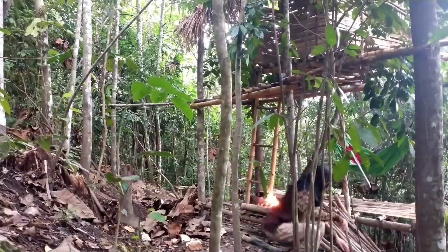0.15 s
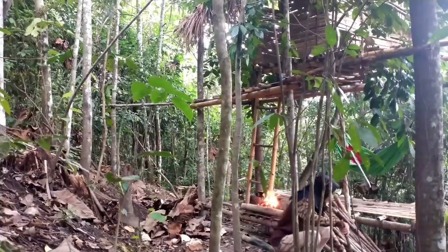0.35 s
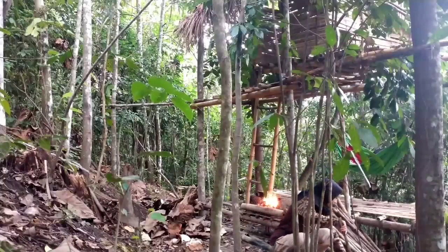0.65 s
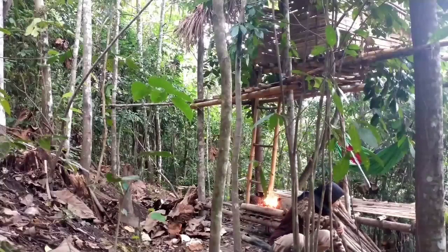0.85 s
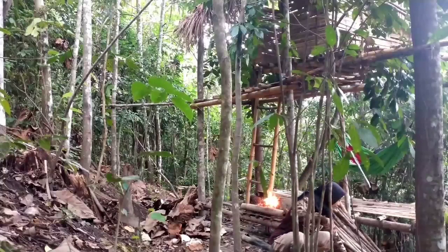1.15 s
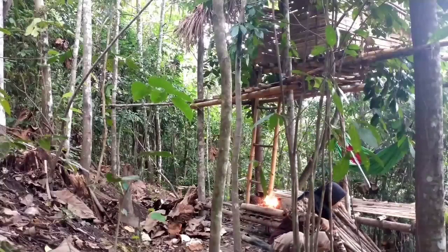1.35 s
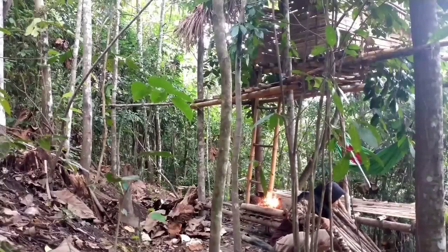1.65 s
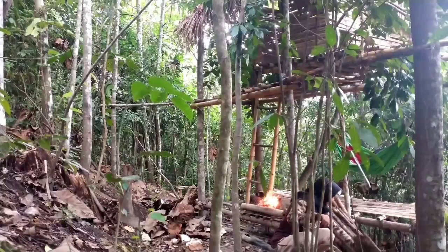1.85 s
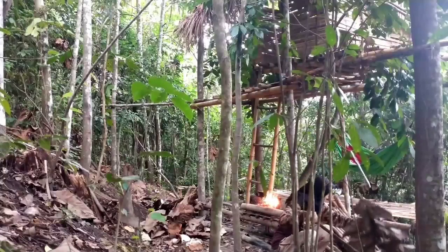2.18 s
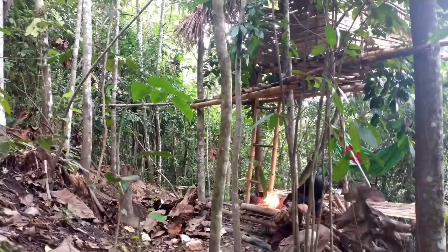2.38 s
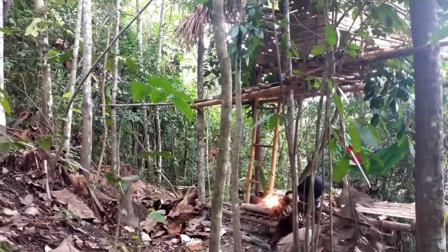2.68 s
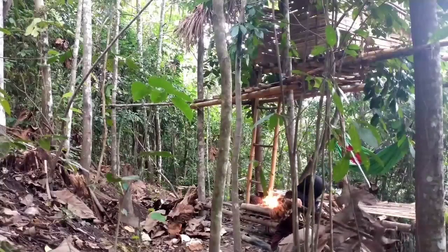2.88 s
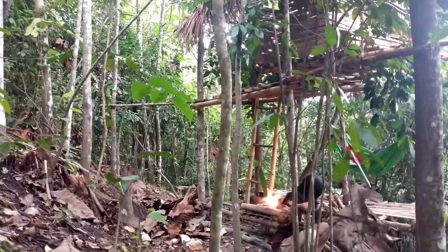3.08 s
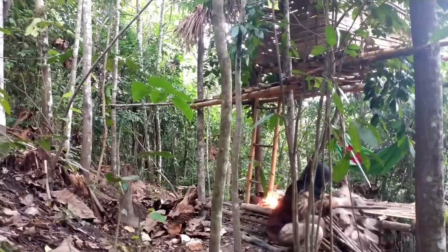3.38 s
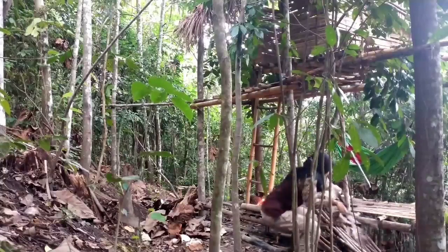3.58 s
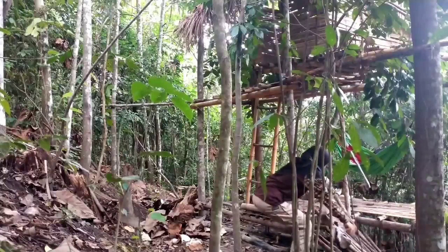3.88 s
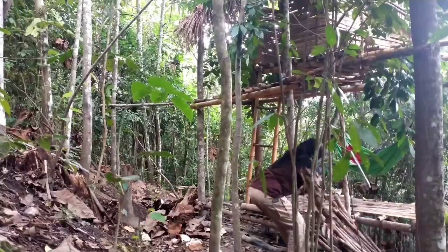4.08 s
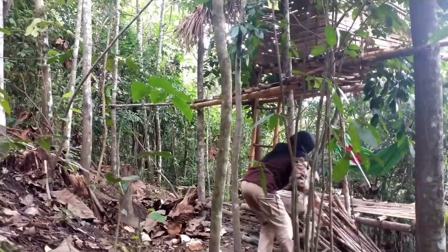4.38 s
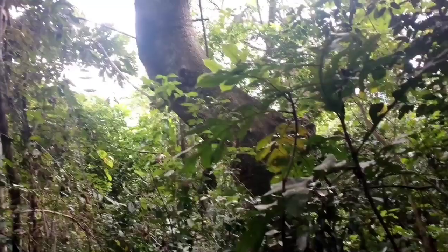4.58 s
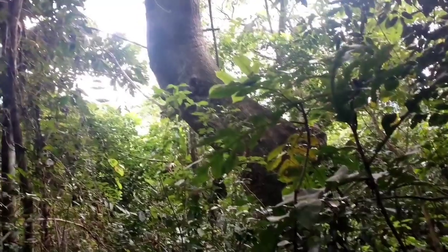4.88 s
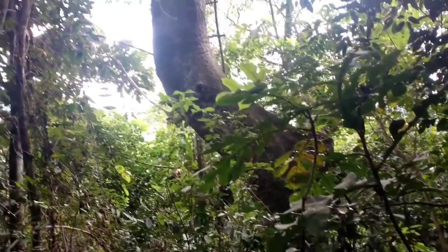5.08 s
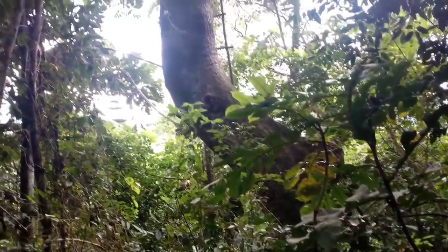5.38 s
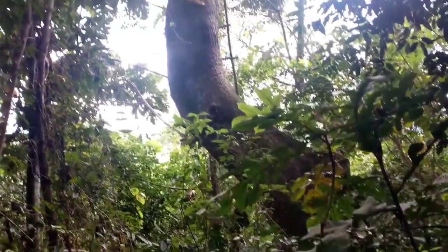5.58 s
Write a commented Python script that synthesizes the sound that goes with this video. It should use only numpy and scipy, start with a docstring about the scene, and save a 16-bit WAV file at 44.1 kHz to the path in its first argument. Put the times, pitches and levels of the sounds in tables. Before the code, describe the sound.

In a humid tropical forest, cicadas give rising whistles that break into rasping buzzes, over a continuous high bush-cricket whine and an intermittent treble shrill. At middle distance someone handles dry leaves and sticks, with light crackles, snaps and small woody knocks. Near the end a cut leads to another spot with louder crickets and no handling. Plain, thin outdoor pickup, same in both channels.

```python
"""Cicadas in a tropical forest: some whistle upwards and break into a buzz, built from the harmonics of their
clicks. Another shrills far up in the treble. Bush crickets, far whines and a distant chorus are blurred tones.
Someone steps and handles dry leaves and sticks: noise bursts that crackle, crack, thud and knock. Air is shaped
noise. Near the end we hear a second place, where the bush crickets are louder and one small cricket trills."""
import sys
import numpy as np
from scipy import signal
from scipy.fft import rfft, irfft
from scipy.io import wavfile

SR = 44100
rng = np.random.default_rng(int(sys.argv[2]) if len(sys.argv) > 2 else 0)


def file_out(sig):
    """Save sig as 16-bit WAV at sys.argv[1]."""
    # one column per channel
    cols = np.atleast_2d(sig).T
    # limit, then scale
    lim = np.clip(cols, -1, 1)
    pcm = np.round(lim * 32767).astype(np.int16)
    wavfile.write(sys.argv[1], SR, pcm)


N = 252957

MOVE_S = 4.84  # when the second place takes over
EDGE_HZ = 15520  # top of the treble
SLOW_ECHO, QUICK_ECHO = 0.32, 0.42  # strength of a whistle's two echoes, as shares of the direct sound
CRICKET_HZ, CRICKET_FULL_DB, CRICKET_HZ_PER_DB = 9225, -49, 15  # pitch at full effort; it sags with the effort
STROKE_ATTACK_S, STROKE_RELEASE_S = 0.014, 0.05

# Levels are set before the swells, the echoes of the forest and the brief dip.
# Moving air and far foliage: (pitch [Hz], strength [dB per Hz, relative])
AIR_SPECTRUM = [(15, 10), (30, -7.5), (60, -5), (120, -11), (250, -20), (600, -22.5), (1300, -21.5),
                (3500, -18), (6300, -21), (8300, -14), (10000, -18), (15500, -14)]
# Level of the air at the first and second place: [dB]
AIR_LEVELS = [-53.5, -56.5]
# Distant chorus: (pitch [Hz], width [Hz], level at first place [dB], level at second [dB])
CHORUS_KINDS = [(1792, 199, -60.5, -60.5), (1803, 60, -66.5, -65.5), (2062, 290, -65.5, -63.5),
                (2334, 260, -67, -66), (2647, 98, -68.5, -74.5), (2874, 130, -66, -73),
                (7410, 870, -67, -68), (10900, 1200, -63, -64), (12720, 2400, -59, -57.5),
                (15100, 2000, -59.5, -61.5)]
# Faint whines from further off; a call that ends before it starts stays silent:
# (start [s], end [s], first pitch [Hz], last pitch [Hz], width [Hz], level [dB])
FAR_CALLS = [(1.8, 2.2, 5520, 5620, 99, -64.5), (1.4, 2.5, 3800, 3640, 200, -78),
             (1.85, 2.5, 3400, 3900, 180, -65), (2.78, 3.46, 2830, 2900, 280, -59.5),
             (4.7, 3.72, 3200, 2950, 28, -65), (3.55, 3.92, 5600, 5480, 470, -69),
             (2.9, 4.5, 3800, 3400, 710, -71), (4.4, 5.2, 5400, 5400, 1600, -70)]
# Effort of the bush crickets, tiring at the first place and fresh at the second: (time [s], level [dB])
CRICKET_EFFORT = [(0, -49), (3.4, -54.5), (3.55, -61), (4.8, -68), (4.96, -46), (5.12, -50), (5.74, -48)]
# Bush cricket voices, mixed before the effort sets their level:
# (pitch [factor on the centre], width [Hz], share at first place [dB], share at second [dB])
CRICKET_VOICES = [(.972, 53, -7.5, -7), (.9915, 100, -6.5, -3), (1, 99, -4.5, 0.5), (1.02, 32, -3.5, -17),
                  (1.003, 620, 2, -2)]
# Colour of the leaf crackle: (pitch [Hz], strength [dB per Hz, relative])
LEAF_SPECTRUM = [(200, -18), (700, -6.5), (1500, -1), (3000, 5), (5000, -5.5), (8000, 0), (12000, -1.5),
                 (15500, 0)]
# Colour of the dull scraping of the litter: (pitch [Hz], strength [dB per Hz, relative])
LITTER_SPECTRUM = [(60, -34), (170, -9), (400, -6), (650, -5.5), (1100, -2), (1600, 1), (2500, -1),
                   (4500, -12.5), (9000, -38)]
# Pushes on handfuls of dry leaves, levels before each rustle's own lift:
# (start [s], end [s], crackle [dB], scraping [dB], fade over the stroke [dB])
LEAF_STROKES = [(0.013, 0.041, -46, -61, 4.5), (0.4, 0.604, -72, -63.5, 6.5),
                (1.007, 1.642, -61.5, -63, -1), (1.656, 2.5, -56.5, -61.5, 0.5),
                (2.137, 2.227, -47, -73, 1.5), (2.354, 2.508, -51, -73, 8), (2.503, 4.1, -72, -72, 0),
                (4.115, 4.486, -46, -53.5, 10.5), (4.47, 4.78, -61, -69, 10), (4.785, 4.79, -50, -69, 5)]
# Cracks of dry leaves: (time [s], peak level [dB])
LEAF_CRACKS = [(0.031, -47), (2.169, -36), (2.2015, -30.5), (2.409, -43), (2.495, -33), (4.17, -32.5),
               (4.186, -31.5), (4.236, -29.5), (4.282, -36), (4.376, -35), (4.39, -35), (4.798, -32.5)]
# Knocks and snaps of sticks, led by one footfall with a heavy low thud: # (time [s], peak level [dB], main ring
# [Hz], thud [Hz], thud in the mix [dB])
STICK_KNOCKS = [(.023, -44, 1235, 193, 17), (0.988, -38.5, 1270, 480, -6), (1.185, -43, 2200, 400, -25.5),
                (1.333, -49, 894, 330, -14), (1.449, -43.5, 1310, 405, -18), (1.755, -53, 900, 330, -21),
                (1.898, -50, 1180, 400, -5), (2.154, -42, 1270, 356, 1), (2.437, -47.5, 1090, 400, -15),
                (2.945, -50.5, 1300, 400, 2), (3.806, -49, 1070, 400, -7), (4.186, -56, 1380, 400, -3),
                (4.278, -47.5, 930, 453, 4), (4.48, -46.5, 740, 437.5, 3), (4.626, -51, 1230, 404, -12),
                (4.676, -42, 2200, 335, -11), (4.796, -46, 1255, 400, -27)]
# Ringing modes of a stick, each pitch then varied a little:
# (pitch [factor on the main ring], strength [dB], time to fall 60 dB [s])
STICK_MODES = [(.55, -4, 0.008), (.8, -7, 0.0099), (1, 6, 0.02), (1.2, -3, 0.086), (1.85, -2, 0.028),
               (3.1, -22, 0.015)]
# Shrill cicada, one list of points a bout: (time [s], rib rate [Hz], level [dB])
SHRILL_BOUTS = [
    [(0, 1843, -49), (.8, 1830, -49.5), (1.55, 1834, -48.5), (1.72, 1795, -51.5), (1.88, 1760, -58)],
    [(3.33, 1857, -56), (3.48, 1834, -49.5), (4.1, 1840, -49), (4.78, 1832, -49.5), (4.87, 1850, -74)],
]
# Harmonics of its rib rate: (harmonic [number], strength [dB, relative])
SHRILL_HARMONICS = [(5, -10), (6, -.5), (7, 2), (8, 0.5)]
# Buzzes: (start [s], end [s], click pairs [per s], level [dB], treble edge [Hz], swell [s])
BUZZ_CALLS = [(0.412, 1.08, 142.3, -56.5, 6760, 0.053), (0.977, 1.62, 145.1, -57.5, 6300, 0.042),
              (2.764, 3.373, 150.0, -49, 8750, 0.045), (4.446, 4.867, 143.3, -56.5, 6470, 0.1)]
# Resonances of a buzzing cicada's body: (pitch [Hz], width [Hz], strength [dB, relative])
BUZZ_RESONANCES = [(3153, 27, 2), (3500, 1040, -12.5), (4354, 28, -1.5), (4670, 250, -7), (4940, 81, 0.5),
                   (5215, 134, 0.5), (5630, 210, -2), (6080, 123, -3), (6450, 85, 0), (6800, 130, -4),
                   (7950, 600, -8)]
# Whistles, levels before a common lift: (start [s], end [s], pitch approached at the end [Hz],
# first level [dB], last level [dB], crest [s], slow swells [per s], quick swells [per s])
WHISTLE_CALLS = [(-.2, .464, 2989, -48.5, -52, 0.076, 2.6, 5.9),
                 (.41, 1.03, 2928, -50.5, -56, 0.65, 2.94, 9.1),
                 (1.357, 1.892, 3015, -59.5, -56.5, 1.84, 3.16, 10.3),
                 (2.205, 2.81, 3058, -51, -43, 2.75, 2.27, 8.35),
                 (3.85, 4.538, 2994, -53, -53.5, 4.11, 4.1, 11.5),
                 (4.791, 4.878, 2850, -61, -69, 4.82, 3, 10), (5.34, 5.597, 2885, -75, -63, 5.1, 4.5, 6.5),
                 (5.641, 5.802, 2930, -62.5, -56, 5.6, 3, 9.8)]
# The abdomen rings on the tenth harmonic of the tymbal clicks: (harmonic [number], strength [dB, relative])
WHISTLE_HARMONICS = [(8, -25), (9, -12), (10, 2.5), (11, -18.5), (12, -21), (13, -37), (18, -40),
                     (19, -26.5), (20, -26), (21, -55)]


def amp(db):
    """Turns decibels into gain."""
    return 10 ** (np.asarray(db) / 20)


def evened(x):
    """Scales a sound to an average strength (rms) of 1."""
    return x / np.sqrt(np.mean(abs(x) ** 2) + 1e-20)


def clock():
    """The time of every sample, in seconds."""
    return np.arange(N) / SR


def curves(rows):
    """Joins the rows by straight lines, one curve for each column after the time."""
    times, *columns = np.transpose(rows)
    return [np.interp(clock(), times, column) for column in columns]


def gate(start, end, rise=0.015, fall=0.012):
    """Opens between two times, with soft edges."""
    opening = np.clip((clock() - start) / rise, 0, 1)
    closing = np.clip((end - clock()) / fall, 0, 1)
    return opening * closing


def colour(x, points):
    """Shapes how strong each pitch of a sound is, then evens it to rms 1."""
    f, db = np.transpose(points)
    hz = np.fft.rfftfreq(N, 1 / SR)
    gain = amp(np.interp(np.log(hz + 1), np.log(f), db))
    return evened(irfft(rfft(x) * gain, N))


def wander(rate):
    """Random drift of rms 1, up to about this many changes a second."""
    hz = np.fft.rfftfreq(N, 1 / SR)
    slow = rfft(rng.standard_normal(N)) / (1 + (hz / rate) ** 4)
    return evened(irfft(slow, N))


def turns(hz):
    """The phase of a vibration that follows a pitch curve."""
    return 2 * np.pi * np.cumsum(hz * np.ones(N)) / SR


def blur(hz, width):
    """Many voices near one pitch, merged into a fuzzy whine."""
    phase = turns(hz)
    return evened(wander(width / 2) * np.cos(phase) + wander(width / 2) * np.sin(phase))


def forest(x, wet_db, t60):
    """Trunks and leaves scatter the sound into sparse echoes that fall 60 dB in t60 seconds."""
    t = np.arange(SR // 2) / SR
    sparse = (rng.random(len(t)) < 1 / 20) * (t > 0.004)
    taps = rng.standard_normal(len(t)) * sparse * amp(-60 * t / t60)
    echoes = signal.fftconvolve(x, taps / np.linalg.norm(taps))[:N]
    wet = amp(wet_db)
    return (x + wet * echoes) / np.sqrt(1 + wet ** 2)


def by_place(first_db, second_db):
    """A gain that passes quickly from the first place to the second."""
    return amp(np.interp(clock(), [MOVE_S - 0.025, MOVE_S + 0.022], [first_db, second_db]))


def dip(depth_db=-3.5, low_s=0.026, recovered_s=0.19):
    """The level dips briefly as the second place takes over, then recovers."""
    return amp(depth_db * np.interp(clock(), [MOVE_S, MOVE_S + low_s, MOVE_S + recovered_s], [0, 1, 0]))


def air(swell_db=1.16):
    """Low rumble of moving air and a faint hiss from the foliage, made of shaped noise."""
    noise = colour(rng.standard_normal(N), AIR_SPECTRUM)
    return noise * by_place(*AIR_LEVELS) * amp(swell_db * wander(0.78))


def chorus(swell_db=1.8):
    """Far insects of several kinds, each kind swelling slowly on its own."""
    return sum(blur(hz, width) * by_place(first, second) * amp(swell_db * wander(1.7))
               for hz, width, first, second in CHORUS_KINDS)


def far_whines():
    """Short calls, most of them gliding, blurred by distance."""
    total = np.zeros(N)
    for start, end, first, last, width, db in FAR_CALLS:
        hz = np.interp(clock(), [start, end], [first, last])
        total += amp(db) * blur(hz, width) * gate(start, end, rise=0.072, fall=0.065)
    return total


def lone_cricket(hz=4600, chirp_hz=16.5, depth=0.25, db=-77):
    """One small cricket trills unevenly at the second place."""
    strokes = 1 + depth * np.cos(turns(chirp_hz * (1 + 0.17 * wander(7.9))))
    return amp(db) * evened(strokes * blur(hz, 41)) * (clock() > MOVE_S)


def crickets(throb_hz=31, throb=0.078, drift_hz=12, swell_db=0.35):
    """Bush crickets scrape near one pitch and throb with their wing strokes; pitch follows their effort."""
    effort_db, = curves(CRICKET_EFFORT)
    sag_hz = CRICKET_HZ_PER_DB * (effort_db - CRICKET_FULL_DB)
    hz = CRICKET_HZ + sag_hz + drift_hz * wander(6.57)
    voices = np.zeros(N)
    for factor, width, first, second in CRICKET_VOICES:
        wings = 1 + throb * np.sin(turns(throb_hz * (1 + 0.154 * wander(4.2))))
        voices += by_place(first, second) * blur(hz * factor, width) * wings
    return evened(voices) * amp(effort_db + swell_db * wander(3.7))


def rustle(level, spectrum, per_s, spread_db, clump_db, level_db):
    """Dry leaves give way in clumps of tiny snaps, a few of them large."""
    snaps = rng.standard_normal(N) * (rng.random(N) < per_s / SR)
    snaps *= amp(spread_db * np.minimum(rng.exponential(1, N), 4))
    return colour(snaps * amp(clump_db * wander(34)), spectrum) * level * amp(level_db)


def stroke(start, end, fade_db):
    """One push on the leaves: a quick attack, a change of level over its length, a short release."""
    fade = amp(np.interp(clock(), [start, end], [0, -fade_db]))
    return gate(start, end + STROKE_RELEASE_S, STROKE_ATTACK_S, STROKE_RELEASE_S) * fade


def leaves():
    """Every stroke makes the dry leaves crackle and scrapes the litter under them."""
    # overlapping strokes add as powers
    crackle = np.linalg.norm([amp(db) * stroke(start, end, fade)
                              for start, end, db, _, fade in LEAF_STROKES], axis=0)
    scrape = np.linalg.norm([amp(db) * stroke(start, end, fade)
                             for start, end, _, db, fade in LEAF_STROKES], axis=0)
    return (rustle(crackle, LEAF_SPECTRUM, per_s=3200, spread_db=2.0, clump_db=3.5, level_db=1.0)
            + rustle(scrape, LITTER_SPECTRUM, per_s=1300, spread_db=0.5, clump_db=1.9, level_db=2.5))


def cracks(decay_s=0.0028, ring_hz=7900, ring_width_hz=1900, ring_db=8):
    """A leaf rib breaks: a bright burst of a few milliseconds that rings in the dry blade."""
    t, hits = np.arange(SR // 30) / SR, np.zeros(N + SR)
    blade = signal.iirpeak(ring_hz, ring_hz / ring_width_hz, fs=SR)
    for s, db in LEAF_CRACKS:
        burst = np.diff(rng.standard_normal(len(t) + 1)) * np.exp(-t / decay_s)
        burst = signal.lfilter([1], [1, -0.5], burst)  # takes off some of the brightness
        burst = burst + amp(ring_db) * signal.lfilter(*blade, burst)
        hits[round(s * SR):][:len(t)] += amp(db) * burst / abs(burst).max()
    return hits[:N]


def sticks(thud_t60=0.022, contact_s=0.0046):
    """A rough, brief contact rings the modes of a stick and thumps the pile below it; the first row is a
    footfall, mostly a heavy low thud."""
    t, out = np.arange(SR // 5) / SR, np.zeros(N + SR)
    for s, db, hz, thud_hz, thud_db in STICK_KNOCKS:
        ring = amp(thud_db - 60 * t / thud_t60) * np.sin(2 * np.pi * thud_hz * t)
        for factor, mode_db, t60 in STICK_MODES:
            mode_hz = hz * factor * rng.uniform(0.94, 1.04)
            ring += amp(mode_db - 60 * t / t60) * np.sin(2 * np.pi * mode_hz * t)
        contact = rng.standard_normal(len(t)) * np.exp(-t / contact_s)
        knock = signal.fftconvolve(ring, contact)[:len(t)]
        out[round(s * SR):][:len(t)] += amp(db) * knock / abs(knock).max()
    return out[:N]


def shrill(rows, stroke_hz=168, depth=0.25, jitter=0.006, clear_db=-5, skirt_hz=1000, skirt_db=2):
    """Ribs buckle in quick, uneven runs, one run a muscle stroke; only the high harmonics radiate."""
    hz, db = curves(rows)
    steady = turns(hz * (1 + 0.000323 * wander(11.8)))
    uneven = steady + turns(hz * jitter * wander(108.2))
    strokes = 1 + depth * np.cos(turns(stroke_hz * (1 + 0.0766 * wander(28.6))))
    skirt = amp(skirt_db) * wander(skirt_hz / 2)  # spreads each harmonic into a noisy band
    voice = np.zeros(N)
    for k, d in SHRILL_HARMONICS:
        rough = strokes * np.cos(k * uneven) + skirt * np.sin(k * uneven)
        clear = amp(clear_db) * np.cos(k * steady)
        voice += amp(d) * (rough + clear)
    return evened(voice) * amp(db) * gate(rows[0][0] - 0.01, rows[-1][0])


def buzz_body(hz, edge_hz):
    """The body strengthens pitches near its resonances and weakens those above its treble edge."""
    power = sum(amp(d) ** 2 / (1 + (2 * (hz - f) / w) ** 2 / 2) ** 2 for f, w, d in BUZZ_RESONANCES)
    return np.sqrt(power / (1 + (hz / edge_hz) ** 20) ** 2)


def buzz(start, end, rate, db, edge_hz, swell_s, jitter=0.001125, sag=0.0128, uneven_db=-10,
         fade_db=4.5, rasp_db=-16, fray_db=9):
    """Two tymbals click in turn into the body, every other pair weaker; the buzz sags and frays as it ends."""
    tiring = (1 - gate(-1, end, fall=0.131)) ** 2
    level = gate(start, end, rise=swell_s, fall=0.066)
    on = level > 0
    t = clock()[on]
    phase = turns(rate / 2 * (1 + jitter * wander(36)) * (1 - sag * tiring))[on]
    order = np.arange(36, 116)  # harmonics of half the pair rate
    heights = buzz_body(order * rate / 2, edge_hz) * amp(uneven_db * (order % 2))
    tone = np.zeros(len(t))
    for k, height in zip(order, heights):
        # the insect flexes its abdomen, so each partial swells and fades on its own
        flex = amp(fade_db * np.sin(2 * np.pi * (rng.uniform(1, 6) * t + rng.random())))
        tone += height * flex * np.cos(k * phase + rng.normal(0, 1.45))
    clicks = np.zeros(N)
    clicks[on] = evened(tone)
    hz = np.geomspace(1000, 12000, 300)
    body_db = 20 * np.log10(buzz_body(hz, edge_hz))
    rasp = colour(rng.standard_normal(N), np.transpose([hz, body_db]))
    return amp(db) * level * (clicks + amp(rasp_db + fray_db * np.sqrt(tiring)) * rasp)


def swells(crest, slow_per_s, quick_per_s):
    """The climbing pitch passes in and out of step with two echoes; at the crest both add to it."""
    t = clock() - crest
    slow = abs(1 + SLOW_ECHO * np.exp(2j * np.pi * slow_per_s * t))
    quick = abs(1 + QUICK_ECHO * np.exp(2j * np.pi * quick_per_s * t))
    return slow * quick


def whistle(start, end, top_hz, first_db, last_db, crest, slow_per_s, quick_per_s,
            climb_hz_per_s=185, swoop_hz=260, swoop_s=0.05, jitter=0.0012, flutter=0.13, lift_db=1):
    """Tymbal clicks speed up, fast at first, then steadily; the abdomen singles out one harmonic."""
    t = np.clip(clock(), start, end)
    hz = top_hz - climb_hz_per_s * (end - t) - swoop_hz * np.exp((start - t) / swoop_s)
    click_phase = turns(hz * (1 + jitter * wander(89))) / 10  # the whistle is the tenth harmonic
    tone = sum(amp(d) * np.cos(k * click_phase + 2 * np.pi * rng.random()) for k, d in WHISTLE_HARMONICS)
    level = amp(np.interp(t, [start, end], [first_db, last_db]) + lift_db)
    level = level * swells(crest, slow_per_s, quick_per_s) * (1 + flutter * wander(37))
    return evened(tone) * level * gate(start, end, rise=0.017, fall=0.06)


def scene():
    """Adds all sources, some with echoes of the forest; both channels are alike."""
    background = air() + chorus() + far_whines() + crickets()
    handling = forest(leaves() + cracks(), wet_db=-7.5, t60=0.14)
    handling = handling + forest(sticks(), wet_db=-4.5, t60=0.16)
    shrills = forest(sum(shrill(rows) for rows in SHRILL_BOUTS) + lone_cricket(), wet_db=0.5, t60=0.21)
    buzzes = forest(sum(buzz(*row) for row in BUZZ_CALLS), wet_db=-2.5, t60=0.31)
    whistles = forest(sum(whistle(*row) for row in WHISTLE_CALLS), wet_db=-5.5, t60=0.53)
    mono = background + handling + shrills + buzzes + whistles
    return np.array([mono, mono]) * dip()


def record(dry):
    """Cuts off the treble steeply above EDGE_HZ."""
    lowpass = signal.firwin(1023, EDGE_HZ, window=("kaiser", 8), fs=SR)
    return signal.oaconvolve(dry, lowpass[None], "same", axes=1)


dry = scene()
out = record(dry)
file_out(out)
```